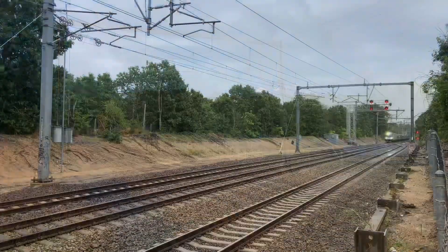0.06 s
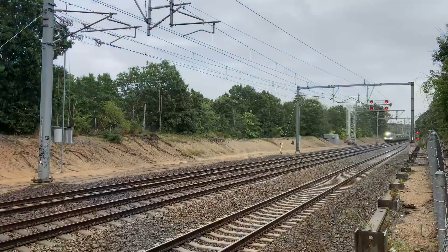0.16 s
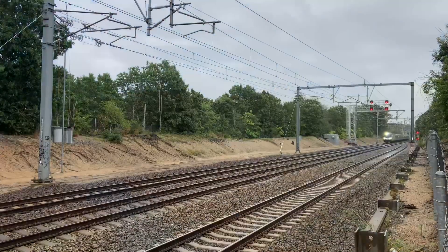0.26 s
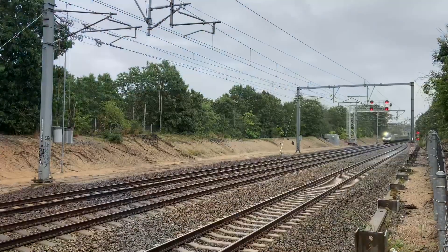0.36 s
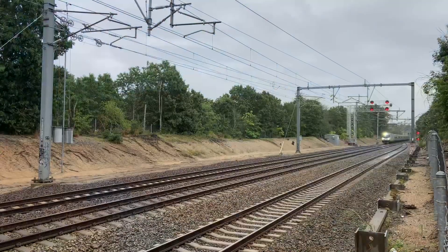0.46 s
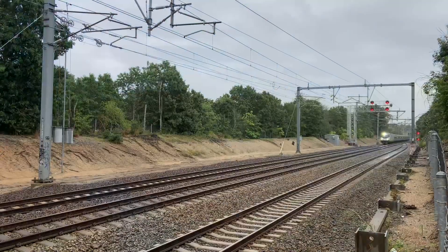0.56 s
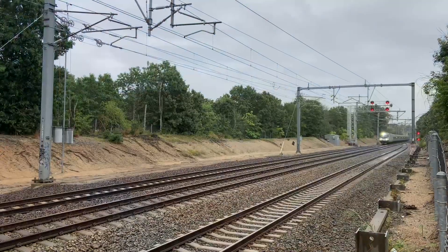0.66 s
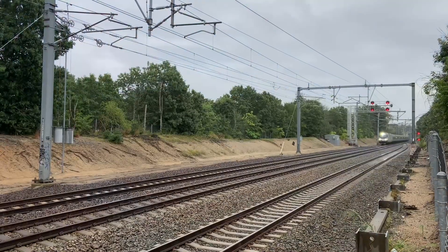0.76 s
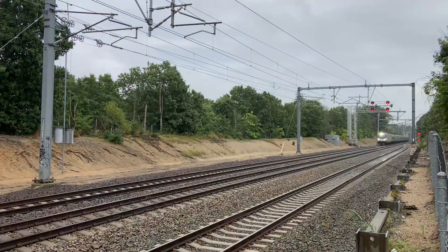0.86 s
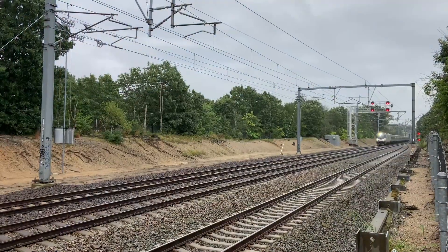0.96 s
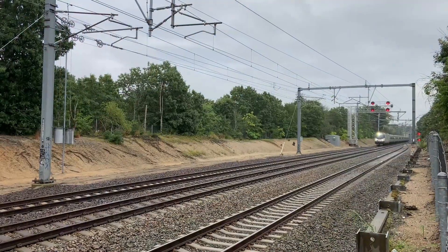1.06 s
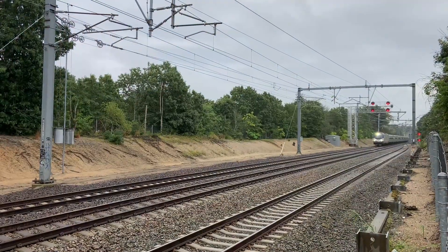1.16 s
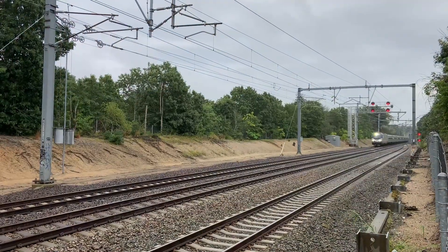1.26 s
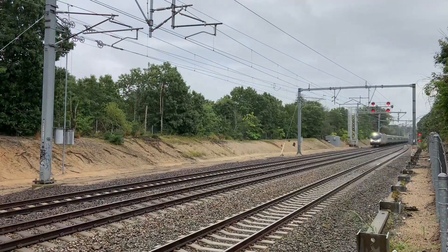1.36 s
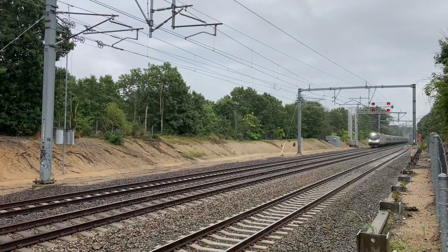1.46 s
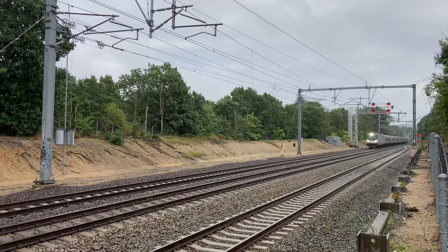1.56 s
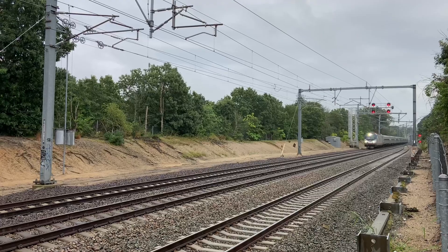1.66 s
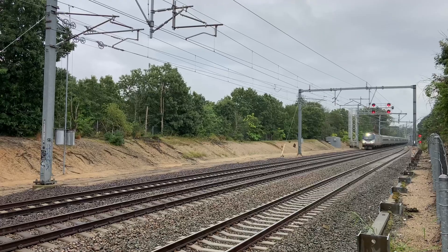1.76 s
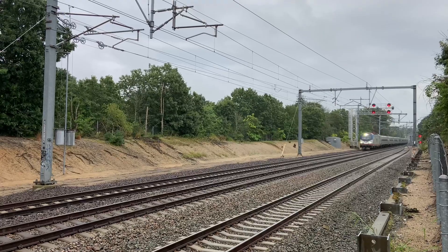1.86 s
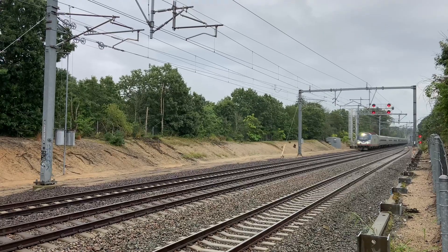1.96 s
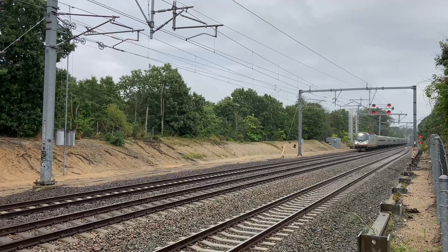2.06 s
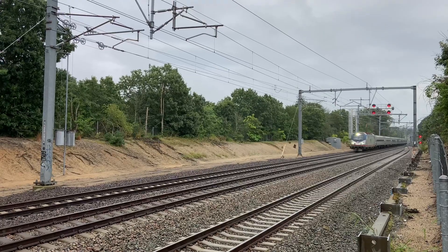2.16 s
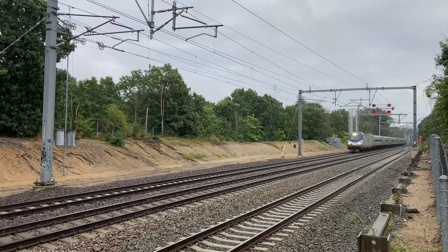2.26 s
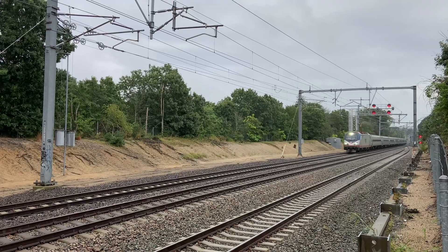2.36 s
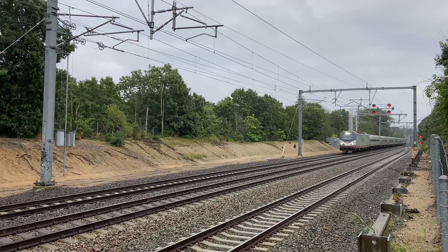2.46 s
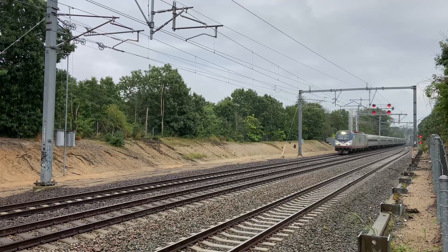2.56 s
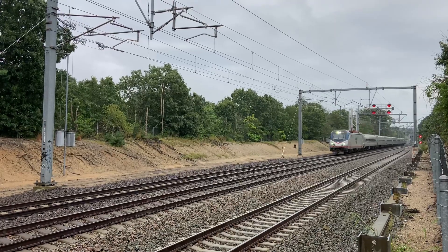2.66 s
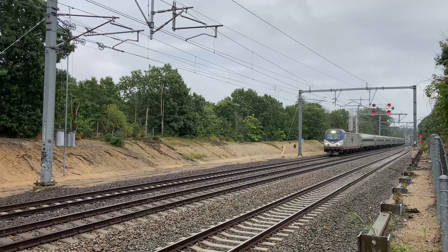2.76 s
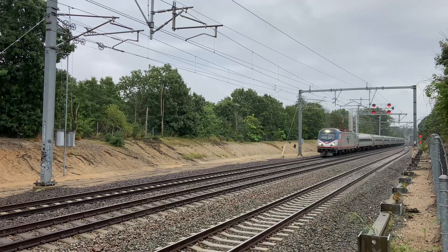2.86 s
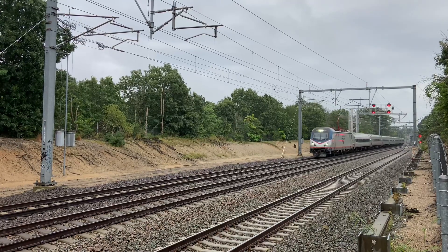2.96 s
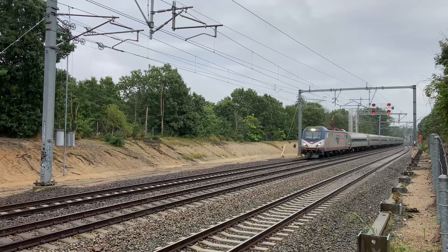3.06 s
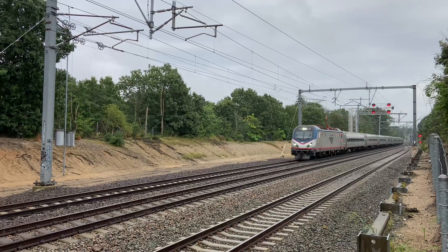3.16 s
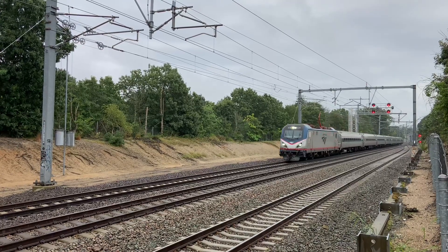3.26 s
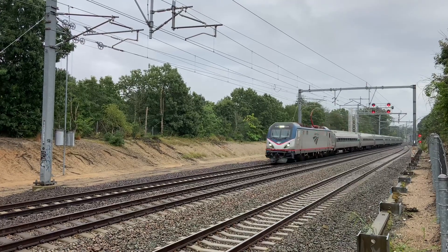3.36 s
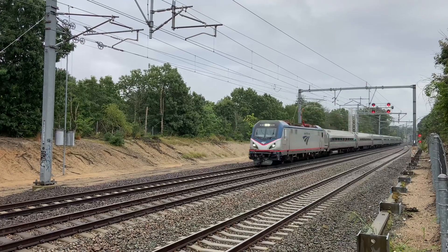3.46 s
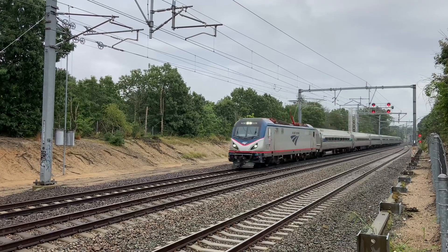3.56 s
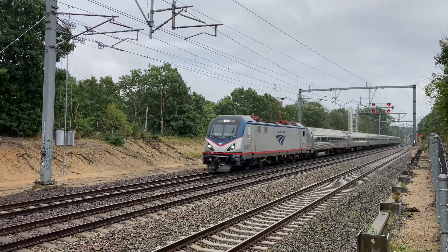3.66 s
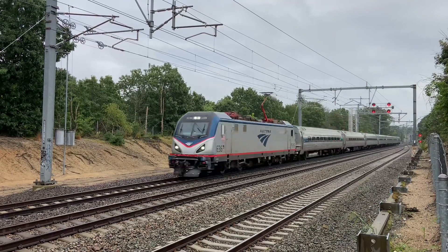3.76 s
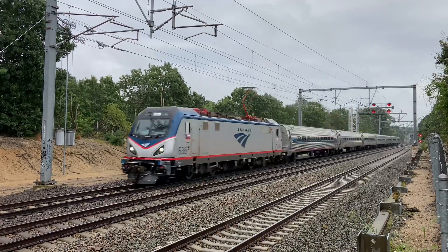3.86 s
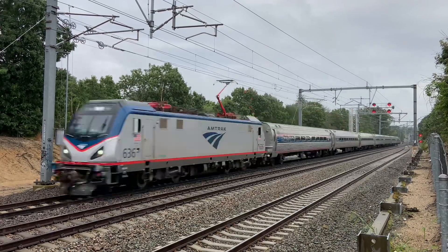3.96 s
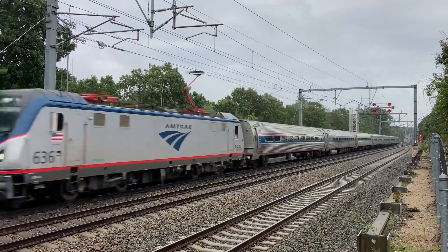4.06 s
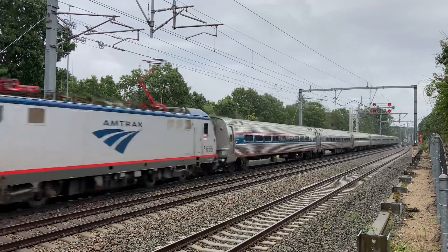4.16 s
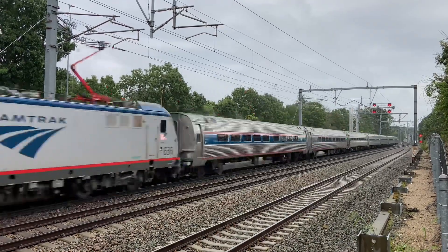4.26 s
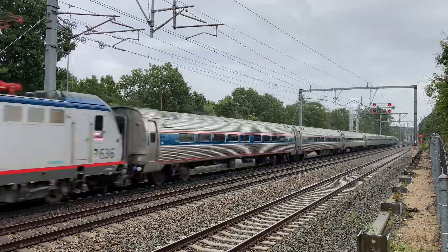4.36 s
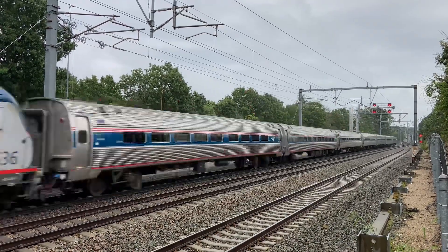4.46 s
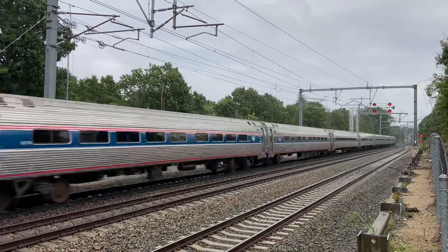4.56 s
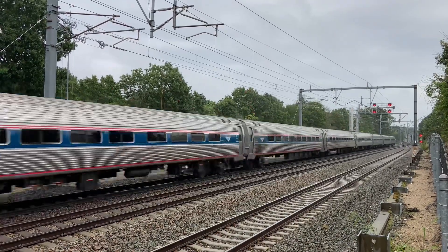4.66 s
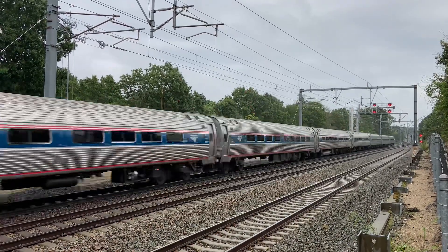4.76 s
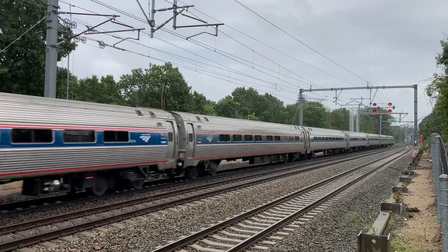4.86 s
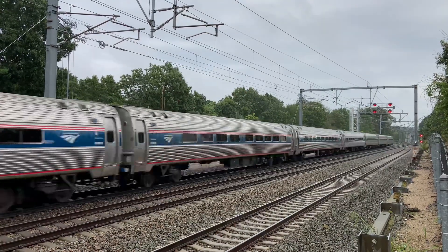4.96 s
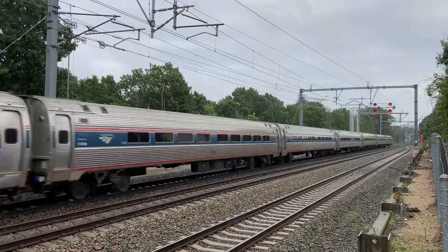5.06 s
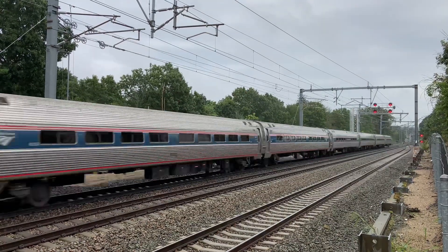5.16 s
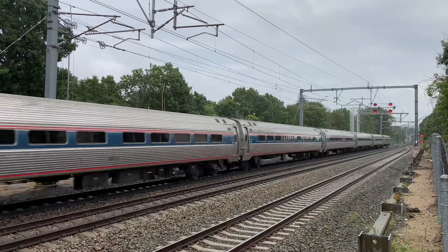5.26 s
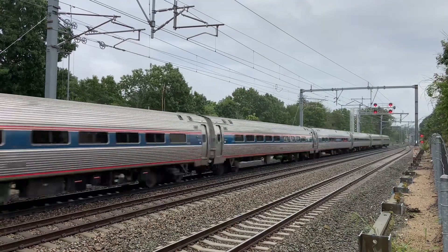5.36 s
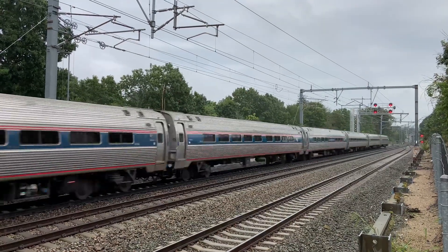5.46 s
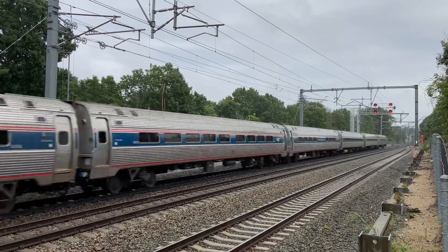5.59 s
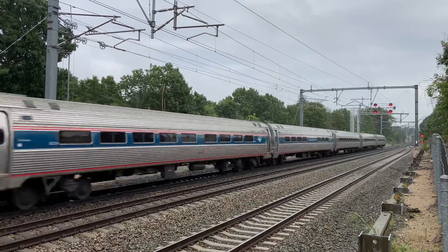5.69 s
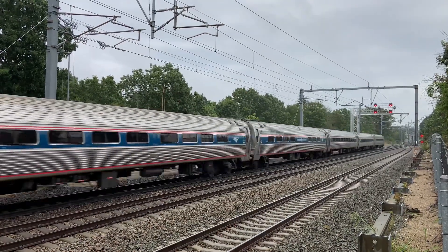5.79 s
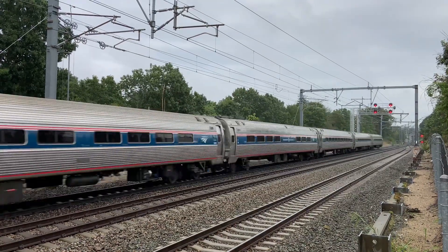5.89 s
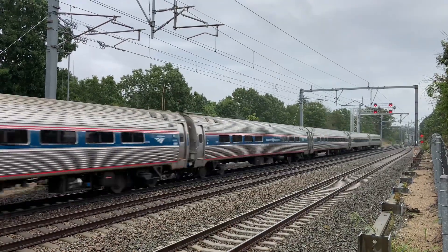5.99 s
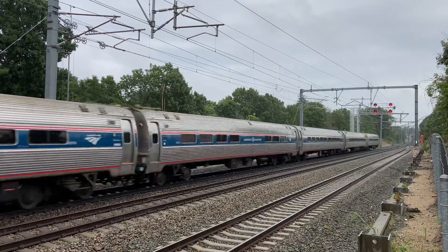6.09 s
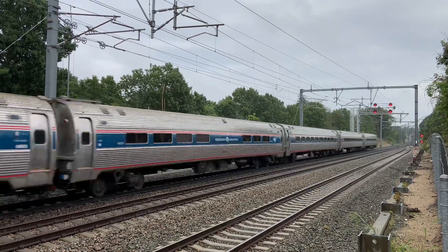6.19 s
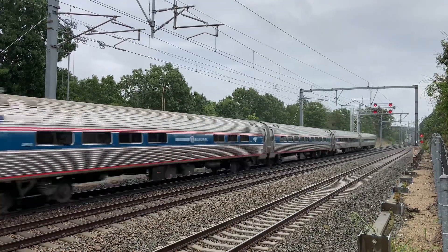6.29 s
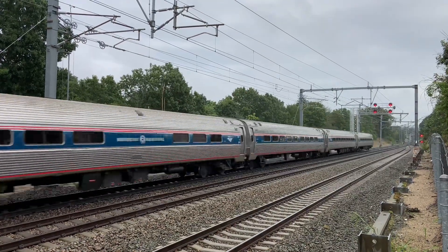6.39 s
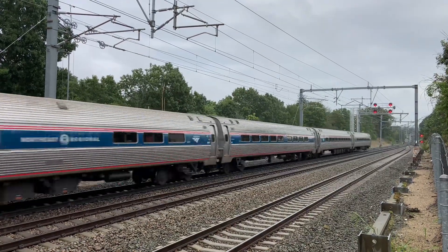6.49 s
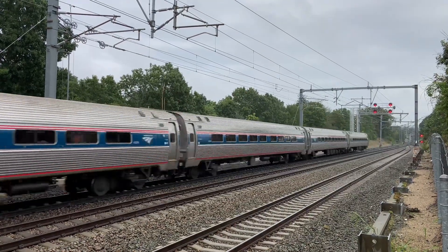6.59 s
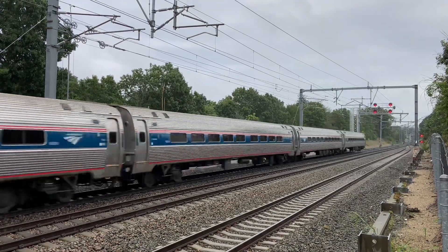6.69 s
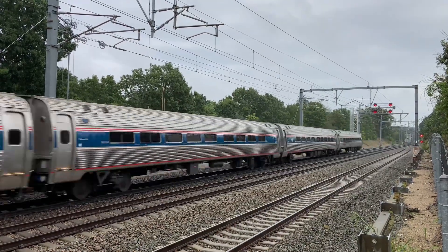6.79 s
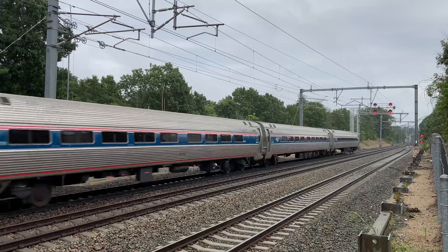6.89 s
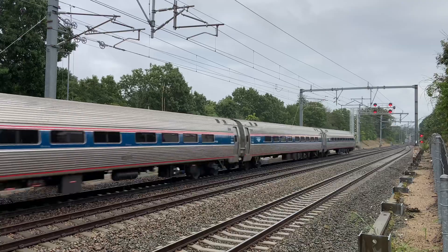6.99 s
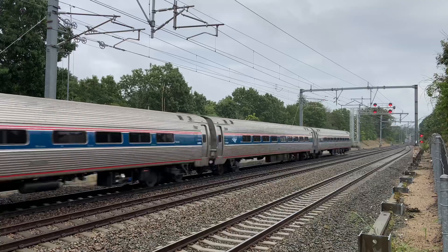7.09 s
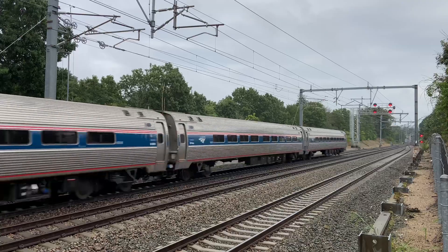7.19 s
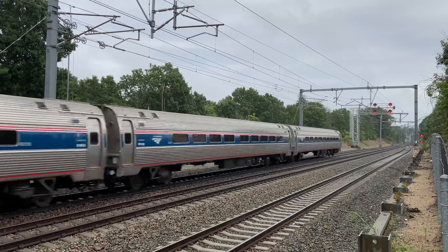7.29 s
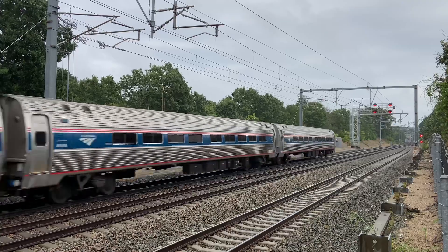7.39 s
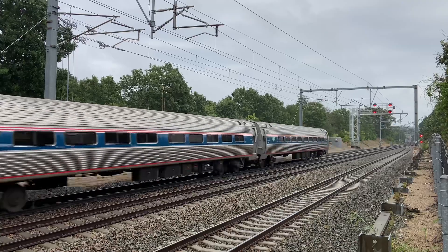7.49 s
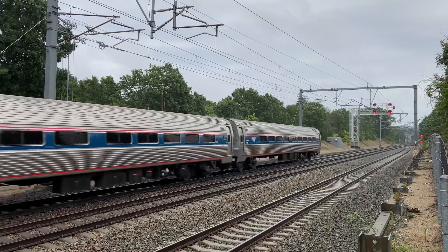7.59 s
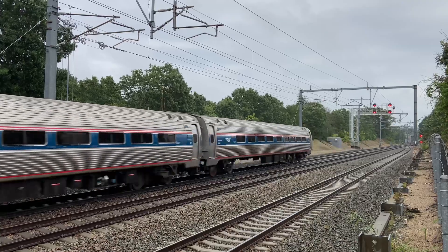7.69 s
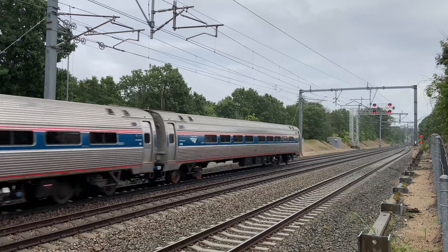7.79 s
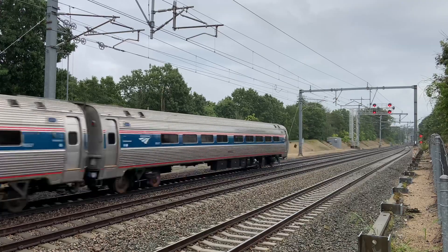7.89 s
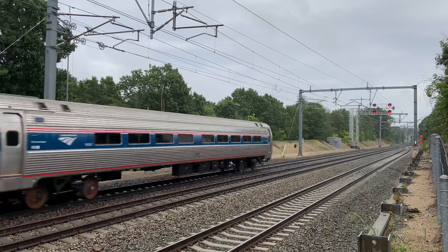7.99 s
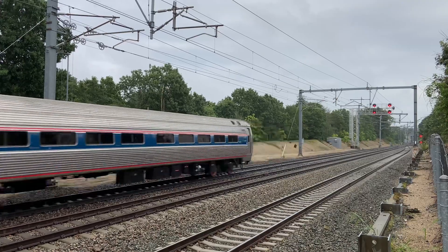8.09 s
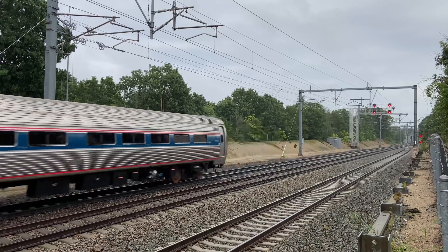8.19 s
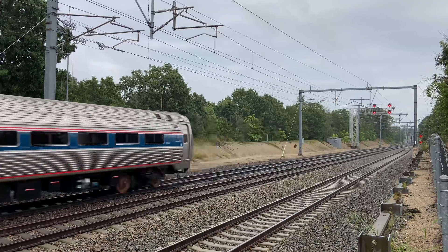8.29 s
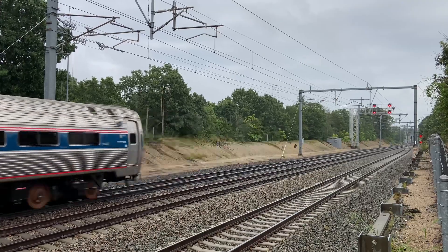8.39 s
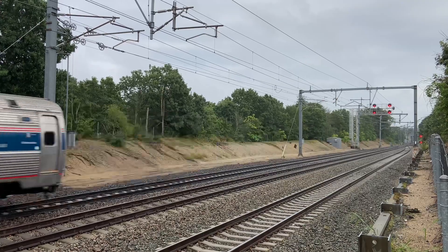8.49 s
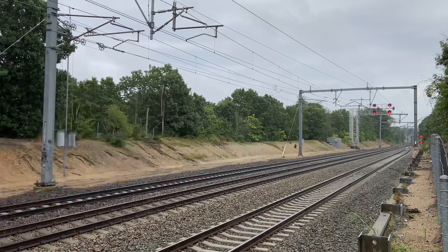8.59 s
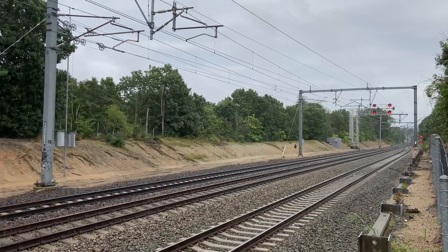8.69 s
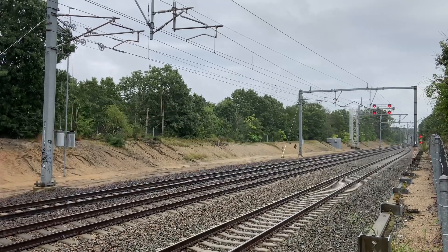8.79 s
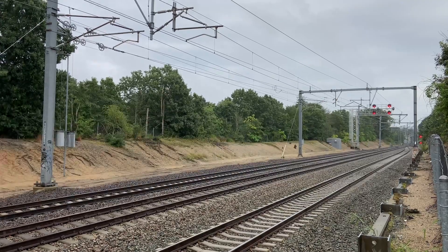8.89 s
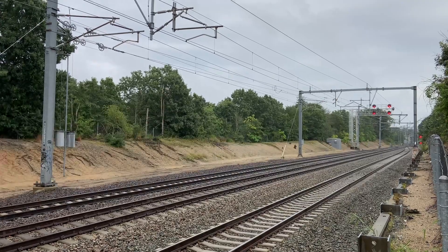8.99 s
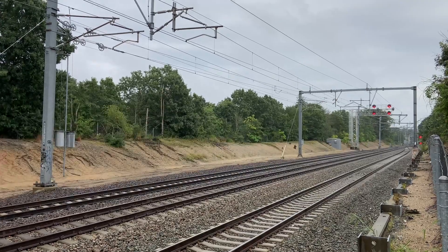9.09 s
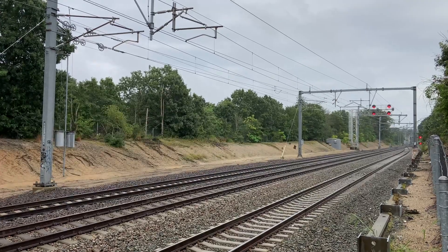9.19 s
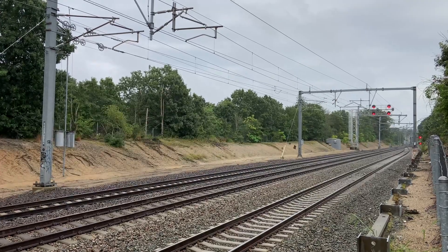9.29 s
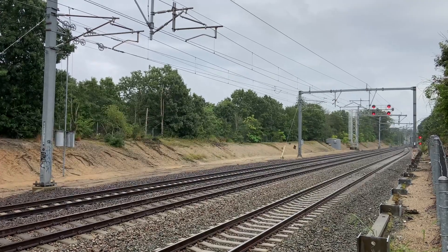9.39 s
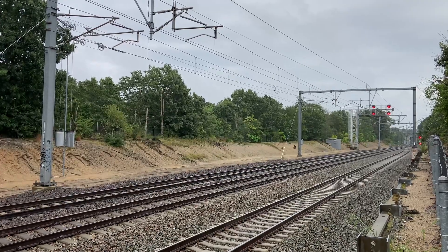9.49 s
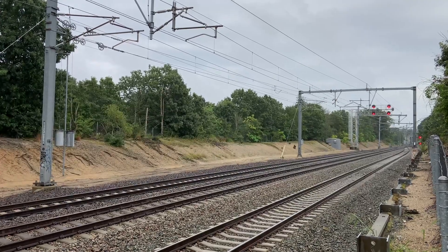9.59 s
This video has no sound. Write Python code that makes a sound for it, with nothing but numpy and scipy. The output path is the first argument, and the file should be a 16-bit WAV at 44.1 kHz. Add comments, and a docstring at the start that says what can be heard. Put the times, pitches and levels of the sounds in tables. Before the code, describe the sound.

Thin singing in the rails, an abrupt high sizzle and a growing whine announce an electric train. The locomotive roars past from right to left, its gears and blowers dropping in pitch. Coaches follow with rumbling, thudding and clacking wheels, brief squeals and thin falling whistles over air hiss and a low boom. The rails sing on as it fades, heard outdoors on a phone two tracks away.

```python
"""A thin singing in the rippled rail, an abrupt high sizzle and a whine announce an electric train.
The locomotive roars by right to left, its gears and blowers dropping in pitch. Seven coaches follow:
bogies rumble, axles thud and clack over two joints, wheels ring and squeal, thin whistles fall above
them. The rail sings on behind, over air hiss and a low boom of ground and bodywork. A phone two tracks
away picks it all up, its two microphone ports hearing each part at their own moment."""
import sys
import numpy as np
from scipy import signal
from scipy.fft import rfft, irfft, next_fast_len
from scipy.io import wavfile
from scipy.ndimage import uniform_filter1d, map_coordinates

SR = 44100
rng = np.random.default_rng(int(sys.argv[2]) if len(sys.argv) > 2 else 0)


def master_out(mix):
    """Clip the mix to full scale and print it as 16-bit PCM to the path in sys.argv[1]."""
    frames = np.transpose(np.atleast_2d(mix))
    ceiling = np.clip(frames, -1, 1)
    pcm = np.round(ceiling * 32767).astype(np.int16)
    wavfile.write(sys.argv[1], SR, pcm)


N = 425124
TIME, FFT = np.arange(N) / SR, next_fast_len(N, True)
FREQ = np.arange(FFT // 2 + 1) * SR / FFT + 1e-3
SPEED_M_S, SOUND_M_S, AWAY_M = 45., 343., 14.
AXLE_GAP_M, JOINT_GAP_M = 2.6, 16.5
NOSE_S, FRONT_BOGIE_S, BLOWER_S, REAR_BOGIE_S = 4.17, 4.39, 4.55, 4.66  # when each is abreast
LAG_COMING, LAG_GONE, COACH_LAG, RAIL_LAG = 2.67, -20.5, -16.5, -13  # samples by which left lags right

# locomotive mix, ahead of its fade-out: t/s, gear whine/dB, blower hum/dB, cooling air/dB, roar/dB
LOCO_LEVELS = [(0, -51.5, -84, -47, -43.5), (1, -48.5, -50, -44, -41), (2, -40.5, -40.5, -37, -35),
               (3, -33, -39, -33, -28.5), (3.5, -28.5, -26, -29, -24), (3.75, -22.5, -21, -29, -23),
               (3.95, -20, -30, -30.5, -20), (4.1, -19, -21, -29, -22.5), (4.35, -19.5, -28, -26, -23.5),
               (4.6, -24, -30.5, -27, -30.5), (4.9, -26, -35, -37.5, -31), (5.3, -29, -53, -40, -41),
               (5.6, -33, -42, -43, -23.5), (6.2, -39, -55, -57, -40)]
# roar spectrum at rest: f/Hz, level/dB
ROAR_SPECTRUM = [(90, -0.5), (160, 0.5), (300, -1.5), (600, -4), (950, -11), (1300, -13), (2100, -13),
                 (3200, -22.5), (5000, -28.5), (8000, -32)]
# cooling air resonances at rest: f/Hz, width/Hz, level/dB
AIR_MODES = [(1057, 350, 7), (1790, 120, -9), (1795, 50, -18), (2470, 270, -6.5), (2513, 30, -16),
             (2586, 35, -15.5), (3220, 50, -23), (3600, 40, -19), (3800, 1040, -6.5), (3915, 60, -21)]
# gear whine at rest: f/Hz, width/Hz, level/dB
WHINE_MODES = [(1314, 14, 6), (1274, 58, 4.5), (1494, 44, -1), (1230, 160, 0.5), (1630, 110, -2),
               (2240, 50, -35), (2560, 100, -7.5), (3900, 68, -21)]
# blower hum at rest: f/Hz, width/Hz, level/dB
HUM_MODES = [(337, 18, 2), (140.4, 16, -5), (192, 15, -6.5)]
# rear gear rush at rest: f/Hz, width/Hz, level/dB
RUSH_MODES = [(2400, 200, -2), (2620, 260, 0), (3950, 260, -11)]
# its envelope, ahead of the fade-out: t/s, level/dB
RUSH_LEVELS = [(0, -60), (4.1, -41), (4.4, -45), (4.6, -35), (4.8, -35.5), (5, -34), (5.2, -60),
               (9.64, -70)]
# tooth-mesh tone, ahead of the fade-out: t/s, front gear/dB, rear gear/dB
MESH_LEVELS = [(0, -57, -70), (2, -52, -65), (3, -39, -55), (3.3, -46, -57), (3.6, -26, -48),
               (3.8, -16, -45), (4.15, -20, -37), (4.3, -24, -20), (4.449, -26, -27), (4.68, -24, -23),
               (4.85, -32, -30), (5.1, -32, -35), (5.5, -42, -47), (9.64, -70, -70)]
# steady rolling of the coaches, ahead of its fade-in: t/s, rumble/dB, wheel ring/dB
COACH_LEVELS = [(4.4, -28, -30), (4.6, -24, -14.5), (4.72, -43, -31), (5.1, -32, -33.5),
                (5.5, -39.5, -35.5), (6, -32.5, -32.5), (6.5, -33.5, -31), (6.75, -30, -30.5),
                (7.15, -34, -35), (7.35, -29.5, -31), (7.65, -34, -35.5), (8.1, -32.5, -31),
                (8.5, -34.5, -34), (8.65, -37.5, -39), (8.88, -36, -37), (8.96, -41.5, -40.5),
                (9.64, -48, -48.5)]
# bogie rumble: f/Hz, level/dB
RUMBLE_SPECTRUM = [(80, -7.5), (140, -5.5), (230, -5), (320, -8.5), (550, -9), (1000, -12.5), (1800, -38.5)]
# wheel ring: f/Hz, level/dB
RING_SPECTRUM = [(600, -13), (1100, 12.5), (1500, 6), (1800, 2), (2250, 2.5), (2550, -5.5), (2900, -1.5),
                 (3400, -30), (4500, -24)]
# hits, a row per bogie: t/s (leading axle on the far joint), near-joint thud leading/dB, trailing/dB,
# far-joint clack leading/dB, trailing/dB
BOGIE_HITS = [(4.459, -28, -27, -34, -32), (4.689, -22, -23.5, -34, -37), (4.951, -24, -29, -38, -36),
              (5.329, -29.5, -31, -26.5, -35), (5.512, -34, -27.5, -28, -47), (5.915, -36, -33, -26, -29),
              (6.094, -26, -26.5, -30, -28), (6.492, -25, -25.5, -22.5, -32),
              (6.672, -21.5, -23, -19.5, -28), (7.073, -26, -27.5, -22, -25),
              (7.25, -31, -25, -24.5, -26.5), (7.655, -27.5, -28, -21.5, -27),
              (7.83, -23.5, -29.5, -29, -31), (8.231, -27, -26, -29, -21), (8.405, -26, -24, -26, -23),
              (8.808, -26, -26, -23, -24)]
# clack resonances of a joint: f/Hz, width/Hz, level/dB
JOINT_MODES = [(800, 1300, 3), (1466, 120, 0), (1840, 180, 2), (2200, 220, 1), (2600, 250, -7)]
# modes of sleepers and rail: f/Hz, t60/s, level/dB
THUD_MODES = [(171.4, 0.2, -14), (251, 0.099, -4), (327, 0.072, -10), (415, 0.096, -2.5), (523, .06, -4.5),
              (960, .03, -8), (1450, .025, -8)]
# wheel squeals and, above 10 kHz, thin falling whistles: start t/s, mid-glide f/Hz, level/dB, fade/s
GLIDE_CUES = [(4.9, 6530, -53, 0.071), (5.0, 3720, -47, .12), (4.97, 11200, -48, .16),
              (5.085, 6130, -41, .22), (5.8, 11200, -48, .12), (5.88, 3920, -46, 0.075),
              (5.9, 1540, -24, .08), (6.271, 3020, -35.5, .5), (6.3, 5950, -48, .2), (6.3, 11400, -47, .12),
              (6.43, 1500, -24, .08), (6.47, 2270, -25, 0.055), (6.55, 10500, -51, 0.23),
              (6.68, 4330, -51, 0.14), (6.88, 1500, -21, .06), (6.93, 4050, -50, .1), (7.0, 6240, -39, .28),
              (7.01, 1486, -17.5, 0.091), (7.05, 10900, -50, .12), (7.16, 3680, -45, .08),
              (7.38, 4000, -47, .1), (7.68, 3560, -35, 0.14), (7.77, 10500, -44, 0.17),
              (7.8, 1530, -38, .08), (7.9, 3120, -40, .2), (8.01, 6100, -44, 0.22), (8.1, 11500, -52, .12),
              (8.18, 6250, -42, .1), (8.27, 4350, -50, .1), (8.32, 2700, -33.5, 0.053),
              (8.5, 4080, -51, .15), (8.5, 11200, -53, .16)]
# pitches for the faint squeals and, above 10 kHz, the faint whistles: f/Hz, level/dB
FAINT_PITCHES = [(1520, -39), (1900, -40), (2270, -38), (2750, -43), (3080, -45), (3680, -45), (4080, -44),
                 (4400, -45), (4950, -49), (5950, -49), (6550, -50), (7100, -54), (10600, -56),
                 (11400, -56)]
# rail tone ahead of the train (first row), then the bands of a high sizzle: f/Hz, width/Hz, level/dB
AHEAD_AND_SIZZLE = [(767, 79, 0), (10900, 2200, 0.5), (14800, 2500, -4), (10660, 60, -6), (11000, 60, -16),
                    (11360, 65, -6), (12150, 90, -15), (12900, 90, -18), (13680, 90, -18), (14438, 90, -20),
                    (15213, 90, -16)]
# rail song behind the train, five low tones first: f/Hz, width/Hz, level/dB
RAIL_BEHIND_MODES = [(700, 78, -2), (1324, 45, -7.5), (1417, 36, -5.5), (2097, 39, -9), (2890, 120, -21),
                     (3330, 200, -27), (4060, 80, -30), (5330, 260, -17), (5790, 80, -18), (7400, 57, -29),
                     (8200, 70, -48), (13300, 200, -20), (14600, 300, -22), (15400, 400, -22)]
# rail song, and the sizzle that switches on abruptly at 1.6 s:
# t/s, tone ahead/dB, sizzle/dB, low tones behind/dB, overtones behind/dB
RAIL_AND_SIZZLE_LEVELS = [(0, -55, -83, -49, -97), (1.58, -64, -69, -54, -85), (1.64, -55, -47, -65, -82),
                          (3, -39.5, -40, -69, -82), (4, -29, -48, -47, -80), (4.5, -35, -63, -41, -78),
                          (5.2, -35.5, -57, -35, -75), (5.5, -34, -72, -36.5, -72),
                          (6, -34.5, -75, -32.5, -73), (6.85, -35, -75, -28.5, -49),
                          (7.25, -34, -75, -28.5, -44), (8, -34, -75, -33, -42),
                          (8.6, -35.5, -78, -30.5, -48), (8.85, -36.5, -80, -32, -47),
                          (9.05, -52, -82, -37.5, -46), (9.25, -46, -84, -35, -51),
                          (9.64, -50, -88, -42, -56)]
# air and wheel hiss: t/s, lower hiss/dB, upper hiss/dB
HISS_LEVELS = [(0, -54.5, -72), (.8, -48, -62.5), (1.6, -47, -57.5), (2.5, -48, -52), (3.15, -42, -45),
               (3.68, -35.5, -36.5), (4, -33.5, -38.5), (4.35, -38, -43), (4.75, -37.5, -48),
               (5.5, -40.5, -47.5), (5.8, -34.5, -42.5), (6.2, -38, -43.5), (6.7, -35.5, -44),
               (7.3, -38, -45.5), (7.8, -37, -43.5), (8.3, -38.5, -45.5), (8.85, -41.5, -52),
               (9.1, -50, -54), (9.64, -55.5, -59)]
# lower hiss colour: f/Hz, level/dB
LOWER_HISS_SPECTRUM = [(2500, 1), (3300, 2), (4100, 0.5), (5200, -5), (6300, -3), (7500, -24)]
# upper hiss colour: f/Hz, level/dB
UPPER_HISS_SPECTRUM = [(5500, -12), (6800, 14.5), (9000, 0), (11000, -4), (13000, -1), (16000, -7)]
# upper hiss bands, each flickering alone: f/Hz, level/dB
UPPER_HISS_BANDS = [(7500, -5.5), (10500, 3.5), (13000, -2.0), (15000, -8)]
# ground and bodywork boom: t/s, level/dB
BOOM_LEVELS = [(0, -35.5), (.8, -31), (1.6, -31.5), (2.2, -25.5), (2.7, -30), (3.2, -19.5), (3.6, -20.5),
               (4.08, -19), (4.3, -35), (4.7, -29), (5.5, -35), (6.4, -34), (7.7, -35), (8.5, -35.5),
               (9.64, -40.5)]
# its resonances: f/Hz, width/Hz, level/dB
BOOM_RESONANCES = [(47.4, 27, 0.5), (63.2, 19, 4), (77.2, 25, 1.5)]
# left port relative to right: f/Hz, level/dB
PORT_BALANCE = [(60, 0), (200, 0), (380, .5), (700, 3), (1290, .5), (2380, -.7), (4400, -2), (8120, 0),
                (15000, 0)]


def locomotive():
    """Roar, cooling air, gears and blowers: made at rest, played faster coming and slower going."""
    whine_db, hum_db, air_db, roar_db = curves(LOCO_LEVELS)
    front, middle, rear = (np.cumsum(passing(s)[1]) for s in (FRONT_BOGIE_S, BLOWER_S, REAR_BOGIE_S))
    rear_gain = np.clip((TIME - 3.9) / .5, .2, .6)  # the body hides the rear bogie on the approach

    def machinery():
        """The noisy layers as they reach the trackside."""
        whine = noise(peaks(WHINE_MODES), .39, 25)
        gears = undb(whine_db) * (read(whine, front) + rear_gain * read(whine[::-1], rear))
        roar = undb(roar_db) * read(noise(shape(ROAR_SPECTRUM), .7, 20), rear)
        air = undb(air_db) * read(noise(peaks(AIR_MODES), .8, 18), rear)
        hum = undb(hum_db) * read(noise(peaks(HUM_MODES)), middle)
        rush = undb(curves(RUSH_LEVELS)[0]) * read(noise(peaks(RUSH_MODES), 4.7, 20), rear)
        return roar + air + gears + hum + rush
    front_db, rear_db = curves(MESH_LEVELS)
    mesh = gear_mesh(front_db, front, 0) + gear_mesh(rear_db, rear, REAR_BOGIE_S - FRONT_BOGIE_S)
    fade_out = np.clip((6.2 - TIME) / 1.37, 0, 1)
    return fade_out * (ports(machinery, swinging_lag(), scatter_db=0) + mesh)


def gear_mesh(db, playhead, later_s, rest_hz=1318, waver_hz=5.):
    """Meshing teeth give a clear, wavering tone that falls as it swings from right to left."""
    cycles = (rest_hz * playhead + np.cumsum(waver_hz * walk(60))) / SR
    tone = undb(db + 2.1 * walk(14)) * np.sin(2 * np.pi * cycles)
    return np.array([delayed(tone, swinging_lag(later_s)), tone])


def coaches():
    """Steel wheels rolling on steel rail, with squeals, thin whistles and thuds on top."""
    rumble_db, ring_db = curves(COACH_LEVELS)
    fade_in = np.clip((TIME - 4.4) / .57, 0, 1)
    rumble_gain = np.hypot(fade_in * undb(rumble_db), swells())

    def rolling():
        """Bogie rumble, clacks and a wheel ring whose four bands flicker separately."""
        bands = [1 / (1 + (4 * np.log(FREQ / hz)) ** 2) for hz in (1100, 1600, 2100, 2700)]
        ring = sum(filtered(noise(shape(RING_SPECTRUM), 3., 22), band) for band in bands)
        rumble = rumble_gain * noise(shape(RUMBLE_SPECTRUM), 1.2, 25)
        return rumble + fade_in * undb(ring_db) * ring + clacks()
    tones = squeals_and_whistles() + thuds()
    return ports(rolling, COACH_LAG, scatter_db=-.38) + [delayed(tones, COACH_LAG), tones]


def axle_clicks(times, leading_db, trailing_db):
    """A click for both axles of each bogie."""
    clicks = np.zeros(N)
    clicks[(times * SR).astype(int)] = undb(leading_db)
    clicks[((times + AXLE_GAP_M / SPEED_M_S) * SR).astype(int)] = undb(trailing_db)
    return clicks


def near_joint():
    """Every axle strikes the near joint before it reaches the far one."""
    far_s, leading_db, trailing_db = np.transpose(BOGIE_HITS)[:3]
    return axle_clicks(far_s - JOINT_GAP_M / SPEED_M_S, leading_db, trailing_db)


def thuds():
    """Sleepers and rail ring dully under each axle on the near joint."""
    age = TIME[:SR // 5]
    ring = sum(undb(db - 60 * age / t60) * np.sin(2 * np.pi * hz * age + rng.normal())
               for hz, t60, db in THUD_MODES)
    return undb(.6) * uniform_filter1d(signal.fftconvolve(near_joint(), ring)[:N], size=12)


def clacks():
    """Each axle shakes both joints into a short burst of metallic noise."""
    far_s, *_, leading_db, trailing_db = np.transpose(BOGIE_HITS)
    blows = axle_clicks(far_s, leading_db, trailing_db) + undb(-1.5) * near_joint()
    return hit_envelope(blows, decay_s=.021) * noise(peaks(JOINT_MODES), 1.9, 60)


def swells():
    """A gain for rumble and hiss that jumps with each thud and dies away."""
    return hit_envelope(near_joint(), decay_s=.035)


def squeals_and_whistles(faint_count=300, attack_s=.012):
    """Squeals glide down as wheels go by, thin high whistles fall above; faint ones come at random."""
    out, waver, flicker = np.zeros(N), walk(250), walk(60)
    when, which, pitch, strength = rng.random((faint_count, 4)).T
    base_hz, base_db = np.array(FAINT_PITCHES)[(which * len(FAINT_PITCHES)).astype(int)].T
    faint_hz = base_hz * (1 + .04 * (2 * pitch - 1))  # each is slightly detuned
    faint_db = base_db + 2 * (2 * strength - 1)
    faint = [(*row, .065, .009) for row in zip(5.3 + 3.5 * when, faint_hz, faint_db)]
    cued = [(*row, .012) for row in GLIDE_CUES]
    for start_s, hz, db, fade_s, waver_depth in cued + faint:
        span = slice(int(start_s * SR), int((start_s + .9) * SR))
        age = TIME[span] - start_s
        own = rng.integers(N // 2) + np.arange(len(age))  # its own stretch of the modulation
        nearness, glide = passing(start_s + .05, TIME[span])
        envelope = nearness ** 1.5 * np.clip(age / attack_s, 0, 1) * np.exp(-(age / fade_s) ** 2 / 2)
        cycles = np.cumsum(hz * (glide + waver_depth * waver[own])) / SR
        out[span] += undb(db + 4 * flicker[own]) * envelope * np.sin(2 * np.pi * cycles)
    return out


def rail_song_and_sizzle():
    """The rail sings near multiples of its ripple rate, higher coming than going; a sizzle cuts in."""
    groups = AHEAD_AND_SIZZLE[:1], AHEAD_AND_SIZZLE[1:], RAIL_BEHIND_MODES[:5], RAIL_BEHIND_MODES[5:]
    levels = curves(RAIL_AND_SIZZLE_LEVELS)

    def layers():
        """Three groups of narrow, noisy rail tones and the high sizzle."""
        return sum(undb(db) * noise(peaks(modes), flicker_db, 14)
                   for db, modes, flicker_db in zip(levels, groups, (2., .8, 2., 2.)))
    return ports(layers, RAIL_LAG, scatter_db=-4)


def hiss():
    """Air and wheel hiss: the lower layer pans with the locomotive and swells with the bogies."""
    lower_db, upper_db = curves(HISS_LEVELS)
    lower = ports(lambda: noise(shape(LOWER_HISS_SPECTRUM), 2., 12), swinging_lag(), scatter_db=.38)
    upper = sum(undb(db) * noise(shape(UPPER_HISS_SPECTRUM) * peaks([(hz, 2600, 0)]), 1.7, 17)
                for hz, db in UPPER_HISS_BANDS)
    wide_upper = np.array([np.roll(upper, SR // 50), upper])
    return undb(lower_db) * (1 + 5.4 * swells()) * lower + undb(upper_db) * wide_upper


def boom():
    """Ground and bodywork boom, nearly the same at both ports."""
    mid, side = (undb(curves(BOOM_LEVELS)[0]) * noise(peaks(BOOM_RESONANCES), .81, 8) for _ in range(2))
    return mid + undb(-21.5) * np.array([side, -side])


def passing(abreast_s, time=TIME):
    """Nearness (1 abreast) and Doppler pitch factor of a point on the train."""
    bearing = np.arctan2(SPEED_M_S * (time - abreast_s), AWAY_M)
    return np.cos(bearing), 1 / (1 + SPEED_M_S / SOUND_M_S * np.sin(bearing))


def swinging_lag(later_s=0):
    """Lag between the ports, in samples, as a point later_s behind the nose swings past."""
    along_m = SPEED_M_S * (TIME - NOSE_S - later_s)
    return LAG_COMING + (LAG_GONE - LAG_COMING) * (1 + along_m / np.hypot(along_m, AWAY_M)) / 2


def ports(make, lag, scatter_db):
    """Direct sound, lag samples late on the left; thin scatter off bank and trees by unequal paths."""
    direct = make()
    scattered = undb(scatter_db) * filtered(make(), 1 / (1 + (700 / FREQ) ** 2))
    return np.array([delayed(direct, lag) + scattered, direct + np.roll(scattered, SR // 50)])


def undb(db):
    """Decibels to gain."""
    return 10 ** (np.asarray(db) / 20)


def curves(table):
    """Columns of a table as curves over time."""
    times, *columns = np.transpose(table)
    return [np.interp(TIME, times, column) for column in columns]


def shape(points):
    """EQ curve through (f/Hz, level/dB) points."""
    hz, db = np.transpose(points)
    return undb(np.interp(np.log(FREQ), np.log(hz), db))


def peaks(modes):
    """EQ curve of steep (f/Hz, width/Hz, level/dB) resonances."""
    return sum(undb(db) / np.sqrt(width) / (1 + (2 * (FREQ - hz) / width) ** 2)
               for hz, width, db in modes)


def filtered(x, gain):
    """Apply an EQ curve."""
    return irfft(rfft(x, FFT) * gain, FFT)[..., :N]


def walk(rate_hz):
    """Random steps smoothed twice into a modulator of spread 1."""
    hold = int(SR / rate_hz)
    steps = np.repeat(rng.standard_normal(N // hold + 1), hold)
    smooth = uniform_filter1d(uniform_filter1d(steps, hold), hold)[:N]
    return smooth / smooth.std()


def noise(gain, flicker_db=0., rate_hz=10.):
    """Coloured noise of rms 1 whose level flickers."""
    x = filtered(rng.standard_normal(FFT), gain) * undb(flicker_db * walk(rate_hz))
    return x / x.std()


def hit_envelope(clicks, decay_s):
    """A softened attack and an exponential tail for every click."""
    return uniform_filter1d(signal.lfilter([1], [1, -np.exp(-1 / (decay_s * SR))], clicks), size=200)


def read(x, playhead):
    """Play x at fractional sample positions."""
    return map_coordinates(x, [playhead], order=2, mode="wrap")


def delayed(x, lag):
    """Play x lag samples late."""
    return read(x, np.arange(N) - lag)


def scene():
    """The whole pass-by in stereo."""
    return locomotive() + coaches() + hiss() + rail_song_and_sizzle() + boom()


def record(dry):
    """Uneven phone ports: deaf to the lowest bass, mostly one shared treble, a steep top cut."""
    left, right = rfft(dry, FFT) / (1 + (38 / FREQ) ** 4)
    shared = .8 / (1 + (6500 / FREQ) ** 16)  # share of the left's power taken from the right
    turn_rad, lag_samples = 2.14, 9.4
    trailing = right * np.exp(1j * (turn_rad - 2 * np.pi * FREQ * lag_samples / SR))
    left = np.sqrt(1 - shared) * left + np.sqrt(shared) * trailing
    tilt = np.sqrt(shape(PORT_BALANCE))
    wet = irfft(np.array([left * tilt, right / tilt]), FFT)[:, :N]
    return signal.sosfilt(signal.ellip(10, .2, 80, 15750, fs=SR, output="sos"), wet)


dry = scene()
out = record(dry)
master_out(out)
```